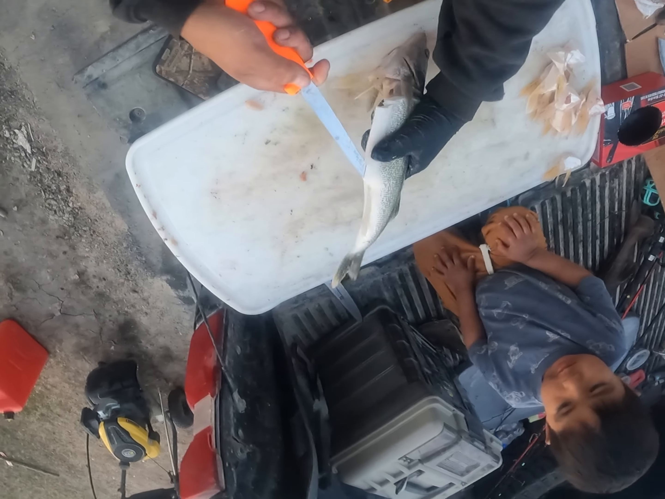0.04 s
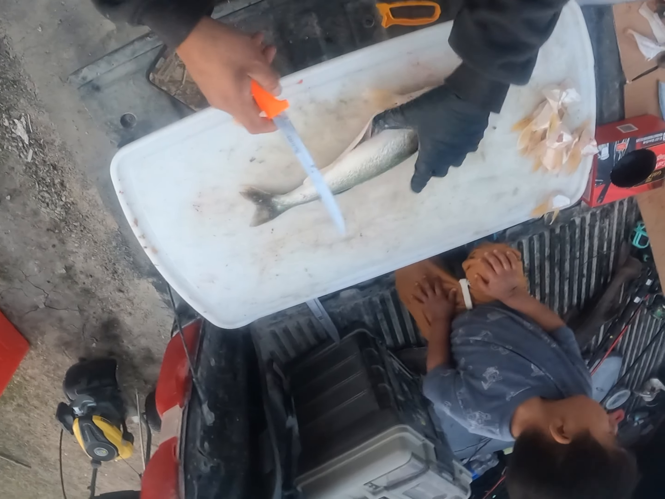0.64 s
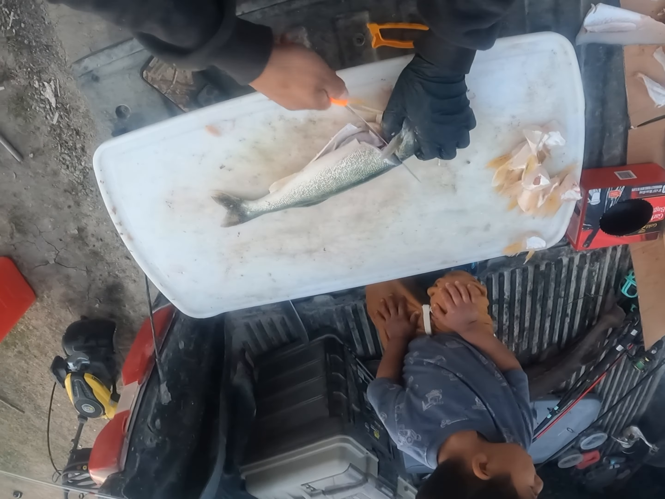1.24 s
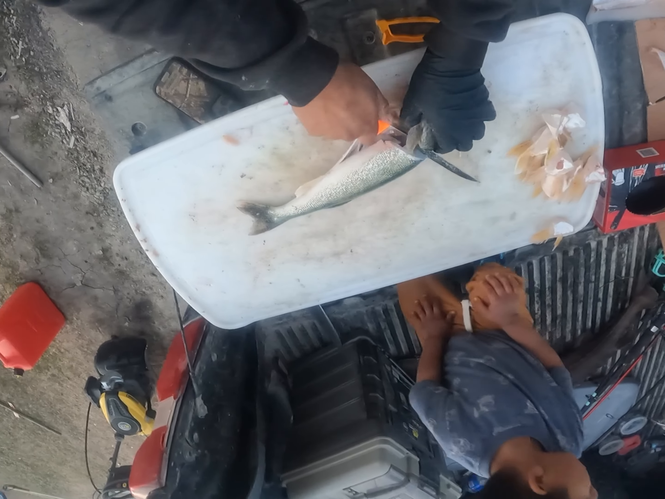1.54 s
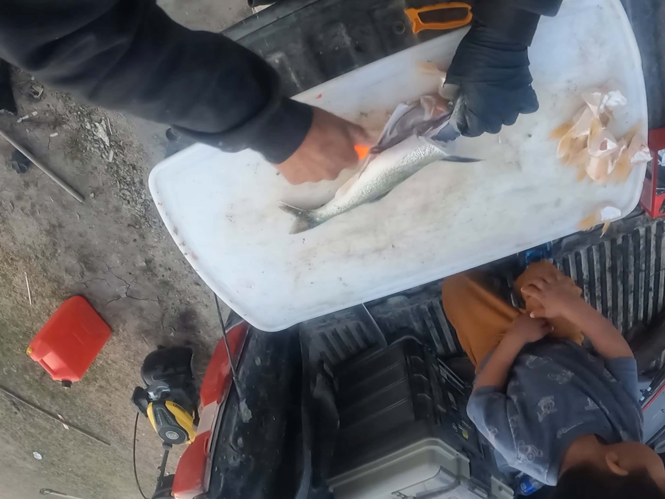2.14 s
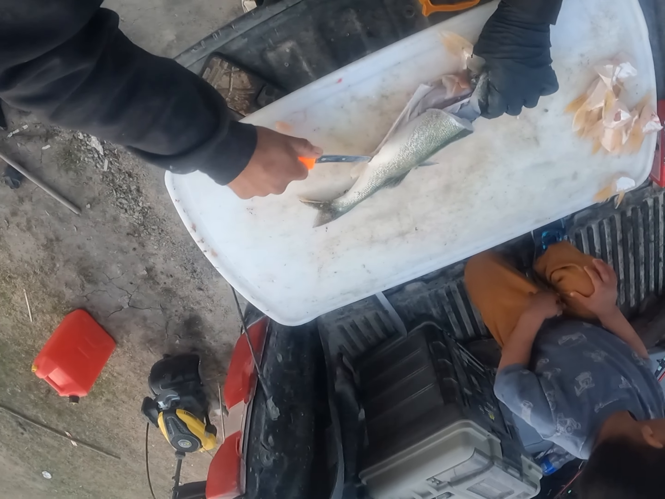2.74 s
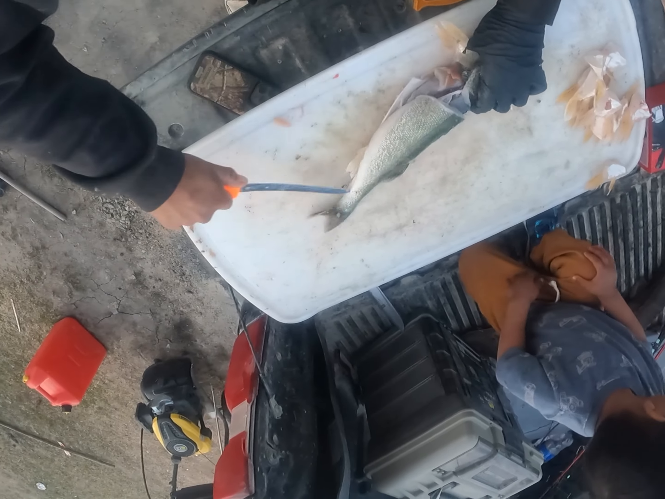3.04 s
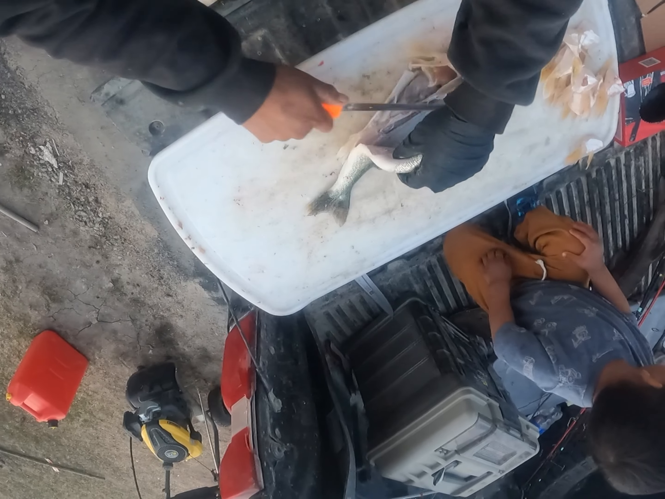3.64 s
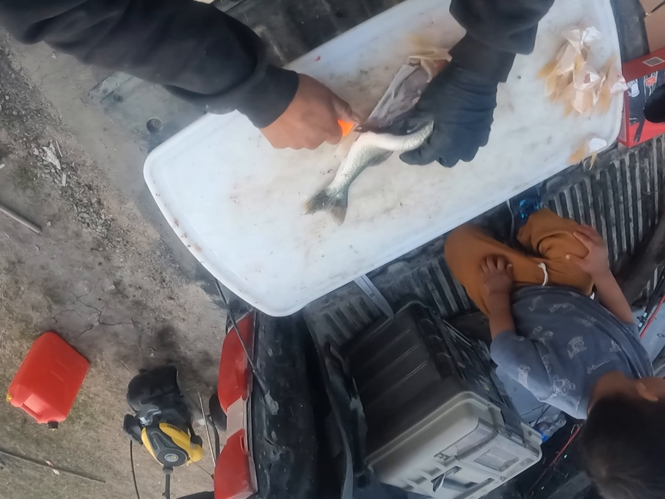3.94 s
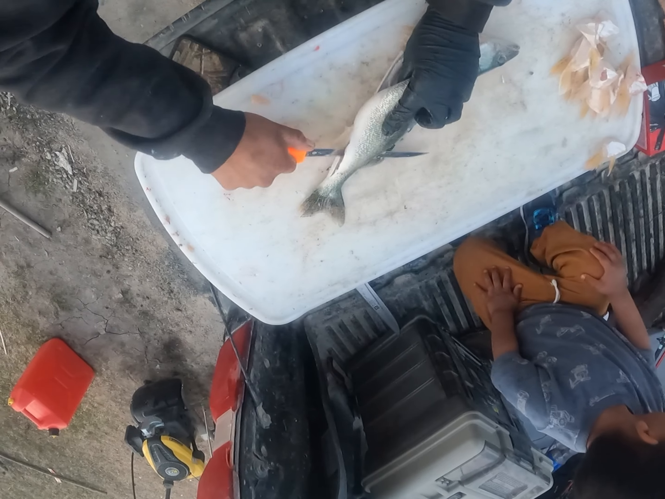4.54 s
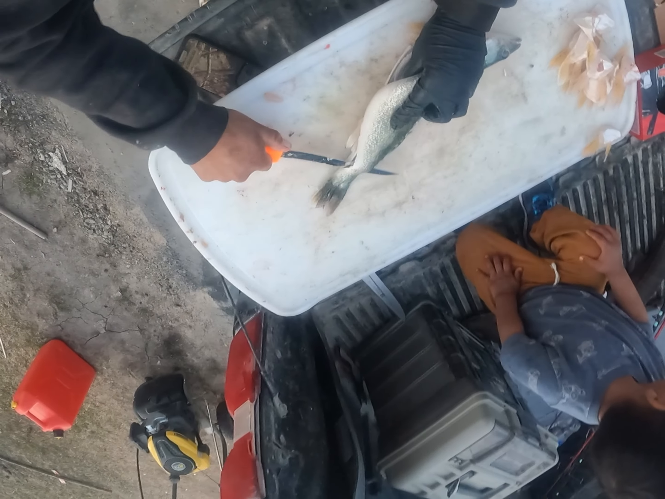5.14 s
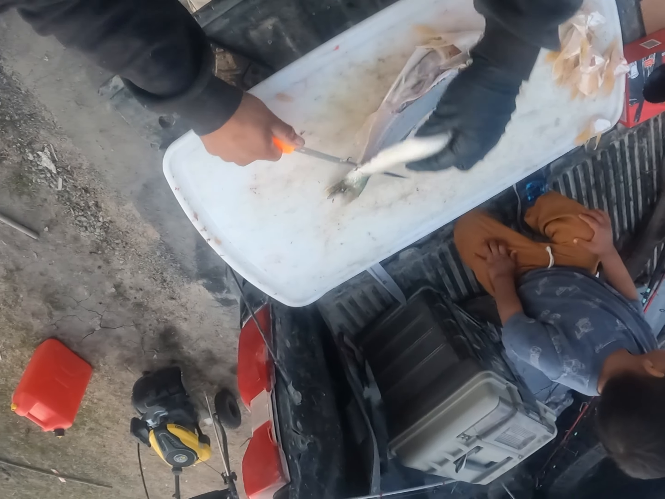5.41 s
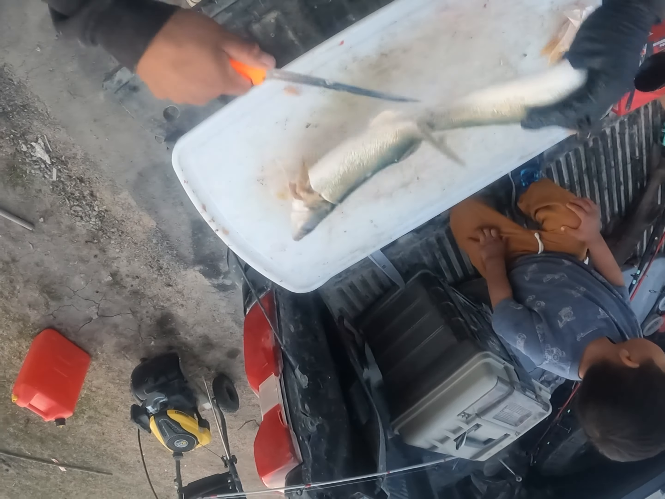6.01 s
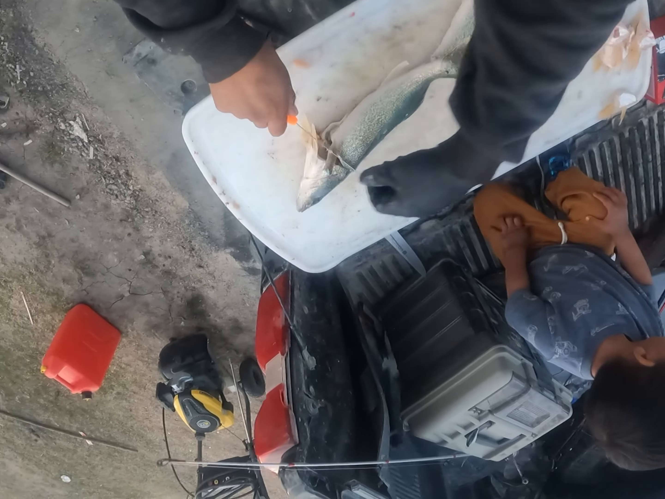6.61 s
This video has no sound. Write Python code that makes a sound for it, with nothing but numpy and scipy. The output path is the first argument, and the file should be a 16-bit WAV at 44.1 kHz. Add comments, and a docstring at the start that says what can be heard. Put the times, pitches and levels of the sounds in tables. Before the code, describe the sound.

A knife clatters lightly on the rim of a plastic cutting board and a fish lands with a wet slap. The blade crunches in through gristle and saws along in short bursts, snapping small bones, then flicks free with a brief ring. Duller strokes and wet slithering follow, and the fish thumps over near the end. The microphone is close, outdoors, with a light breeze on it.

```python
"""A knife fillets a fish on a plastic board, outdoors on a truck's tailgate, stereo microphone close above.
The edge catches and slips as it crunches in behind the head and saws along the backbone; bones snap,
and by the tail the bent blade flicks free and rings. Wet skin slithers in tiny ticks. The board rumbles
under the strokes and thumps when the fish is turned over. The truck throws back short reflections;
behind it all is faint open air, with a light breeze on the microphone."""
import sys
import numpy as np
from scipy import signal
from scipy.fft import rfft, irfft, next_fast_len
from scipy.io import wavfile
from scipy.ndimage import uniform_filter1d

SR = 44100
rng = np.random.default_rng(int(sys.argv[2]) if len(sys.argv) > 2 else 0)


def unload_wav(signal):
    """Save mono or channel-first audio to the path in sys.argv[1] as 16-bit WAV at rate SR, clipped to [-1, 1]."""
    wavfile.write(
        sys.argv[1],
        SR,
        np.round(np.clip(np.atleast_2d(signal).T, -1, 1) * 32767).astype(np.int16),
    )


N = 298557
TIME = np.arange(N) / SR

# Levels in the tables are relative: each source applies its own gain afterwards.
# how alike the two sides of the microphone are: (frequency [Hz], correlation [0-1])
MIC_LIKENESS = [(30, 0.88), (100, 1), (300, 0.97), (600, 0.89), (1200, 0.89), (2200, 0.7), (4500, 0.89),
                (8000, 0.87), (12000, 0.7)]
# tilt between the two sides: (frequency [Hz], left minus right [dB])
MIC_BALANCE = [(200, 0.15), (1000, 0), (2200, 0), (4500, -0.2), (8500, -2), (12000, -3)]
# open air all around: (frequency [Hz], level [dB])
AIR_SPECTRUM = [(15, -41), (25, -9), (139, 0), (237, -4.5), (450, -14.5), (588, -16), (655, -25.5),
                (1310, -14.5), (2130, -26.5), (3010, -25.5), (7480, -39.5), (11800, -45.5), (15000, -56.5)]
# wind buffeting the microphone: (frequency [Hz], level [dB])
BUFFET_SPECTRUM = [(20, -10.5), (45, 6.5), (70, -5.5), (120, -15.5), (300, -61.5)]
# breeze at the microphone: (time [s], level [dB])
BREEZE_CURVE = [(0.0, -42.5), (0.5, -49.5), (0.85, -71), (1.6, -68), (1.95, -51.5), (2.85, -44), (3.4, -65),
                (4.0, -64), (4.65, -44.5), (5.3, -54.5), (5.7, -48), (6.77, -50.5)]
# puffs of air, mostly as the fish is swung about: (time [s], level [dB])
AIR_PUFFS = [(0.05, -38), (0.41, -39), (1.83, -44), (5.85, -35.5), (6.22, -31)]

# the board on its support: (frequency [Hz], level [dB], t60 [s])
BOARD_MODES = [(62.8, -9.5, .2), (85.9, -4, 0.22), (121.7, -5, 0.24), (152.3, -2.5, .16),
               (186.4, -3.5, 0.21), (204.5, -1, 0.19), (238.3, -2.5, .16), (293.2, -3.5, 0.13),
               (329.2, -4, .13), (382.2, -3.5, 0.09), (478.4, -10.5, 0.099), (622.7, -16.5, 0.13),
               (705, -19, 0.078), (757, -18.5, 0.19), (812, -21.5, .1), (900, -13, 0.096),
               (1007, -22.5, 0.18), (1165, -26, .1)]
# hands lean on the board or shift the fish: (start [s], length [s], first level [dB], last level [dB])
HAND_PRESSES = [(0.322, 0.071, -43, -24.5), (0.385, 0.3, -31, -54), (1.546, 0.077, -55, -51),
                (1.845, 0.043, -29.5, -31), (1.9, 0.43, -42, -48.5), (2.335, 0.11, -33, -51),
                (2.832, 0.28, -46.5, -42.5), (3.081, 0.14, -33, -40), (3.207, 0.11, -36.5, -45),
                (4.04, .06, -50, -54), (4.16, 0.163, -46.5, -51.5), (4.68, .3, -50, -54),
                (5.17, 0.41, -50.5, -53.5), (5.6, 0.49, -44.5, -52), (5.794, 0.058, -38, -37.5),
                (6.147, .18, -27.5, -30), (6.361, 0.46, -51.5, -58.5)]
# wet skin slides on blade, glove and board: (start [s], length [s], first level [dB], last level [dB])
SKIN_SLIDES = [(0.0, 0.15, -58, -62), (0.306, 0.068, -48, -54), (0.404, .15, -56.5, -54),
               (0.56, 0.046, -46.5, -47), (0.63, 0.12, -57, -53), (0.836, 0.079, -59.5, -63.5),
               (1.142, 0.021, -64, -57), (1.27, 0.44, -70.5, -60.5), (1.88, 0.21, -56, -61),
               (2.33, 0.11, -49, -70), (2.834, 0.37, -49.5, -49), (3.201, .18, -52, -54),
               (3.425, .33, -60, -58.5), (3.866, 0.034, -54, -55.5), (3.984, 0.053, -59, -57),
               (4.14, 0.34, -56, -57), (4.922, 0.037, -62, -57.5), (5.036, 0.28, -63, -63),
               (5.295, 0.25, -55.5, -63.5), (5.511, 0.2, -51, -51.5), (5.714, 0.38, -62, -57.5),
               (5.888, .07, -49.5, -54), (6.092, 0.2, -43.5, -44), (6.3, 0.078, -52, -67.5),
               (6.597, 0.19, -72, -67)]
# sliding wet skin, close up: (frequency [Hz], level [dB])
SLITHER_SPECTRUM = [(200, -11), (500, 1.5), (800, -6.5), (1100, -2), (1600, -1), (2200, -3.5), (3100, -1),
                    (5000, 2), (6300, -0.5), (7400, 2.5), (8700, -4), (12000, -6.5), (15000, -22)]
# dull knocks on the board: fish and knife landing, and the thud of a bone cracking mid-cut:
# (time [s], slap [dB], slap pitch [Hz], thud [dB], slap t60 [s])
BOARD_KNOCKS = [(0.386, -15, 497, -25.5, 0.076), (0.391, -8, 4000, -32.5, 0.026),
                (0.851, -60, 730, -47, .04), (1.336, -45, 500, -53.5, 0.021),
                (1.796, -12, 990, -28.5, 0.025), (2.102, -35.5, 760, -57, 0.15),
                (2.142, -17, 917, -29.5, 0.098), (4.488, -20.5, 990, -40, 0.048),
                (4.621, -32, 500, -31.5, 0.02), (5.074, -34.5, 585, -44, 0.032),
                (5.816, -38, 600, -39, 0.3), (6.148, -12, 1330, -29, 0.047), (6.191, -7.5, 700, -21, 0.03),
                (6.292, -19.5, 895, -30, 0.083)]
# a wet slap: (frequency [Hz], level [dB])
SLAP_SPECTRUM = [(200, -6.5), (500, 4), (800, 2.5), (1500, -4), (2600, -4.5), (4600, -3.5), (6200, -12),
                 (7300, -11), (9000, -16.5), (12000, -23.5), (15000, -46)]

# the blade clatters on the board's rim: (time [s], level [dB], pitch [Hz])
RIM_TAPS = [(0.183, -30, 2060), (0.193, -26, 1470), (0.218, -21, 2080), (0.246, -23.5, 5150),
            (0.255, -18.5, 1350)]
# the ringing blade: (frequency [Hz], level [dB], t60 [s])
KNIFE_MODES = [(341, -5.5, 0.075), (700, -21, 0.044), (1100, -24.5, 0.1), (1550, -21.5, 0.071),
               (1930, -18.5, 0.049), (2483, -20, 0.051), (3495, 1.5, 0.0099), (3616, 1.5, 0.018),
               (4600, -18.5, 0.032), (4970, -19, .03), (5800, -9, 0.022), (5735, -4, 0.013),
               (7100, -8.5, 0.018), (7380, -17, .02), (8980, -14.5, 0.013), (10300, -25, .012)]
# bones, scales and fin rays give way: (time [s], level [dB], pitch [Hz])
BONE_CRACKS = [(0.1, -31.5, 1870), (1.663, -26.5, 3840), (1.684, -22.5, 2400), (1.73, -19, 4600),
               (1.776, -15, 4970), (1.811, -14.5, 5070), (1.84, -15.5, 3460), (2.205, -21.5, 1550),
               (2.231, -13.5, 5030), (2.264, -19, 5790), (2.298, -8.5, 1860), (2.318, -20.5, 5500),
               (2.374, -30.5, 1200), (2.581, -25.5, 1790), (2.601, -24.5, 4500), (2.652, -25, 3980),
               (2.671, -18, 3800), (2.844, -23.5, 7700), (2.895, -23, 2970), (4.39, -32, 3320),
               (4.489, -17, 1370), (4.541, -26.5, 4600), (4.581, -27.5, 4840), (4.617, -27.5, 2380),
               (4.82, -29, 7300), (4.845, -29, 5210), (4.885, -29.5, 5240), (5.094, -26.5, 5090),
               (5.937, -31, 1220), (6.107, -29.5, 7550), (6.209, -20, 2760)]
# a hard crack or click: (frequency [Hz], level [dB])
FRACTURE_SPECTRUM = [(200, -14), (700, 0), (1500, -0.5), (2600, -3), (4600, 0), (6200, -2), (7300, -1.5),
                     (9000, -9), (12000, -15.5), (15000, -29.5)]
# fine bones and scales splintering: (frequency [Hz], level [dB])
SPLINTER_SPECTRUM = [(1000, -16.5), (2500, 0), (5000, 1.5), (8000, -2), (12000, -11), (15500, -20.5)]
# tearing gristle: (frequency [Hz], level [dB])
CRUNCH_SPECTRUM = [(250, -24.5), (520, -1.5), (660, -0.5), (920, 1), (1150, -5.5), (1700, -4.5),
                   (2700, -6.5), (4600, -4), (7200, -11.5), (9000, -19), (12000, -26.5), (15000, -37.5)]
# how a slipping edge drives the board: (frequency [Hz], level [dB])
JUDDER_SPECTRUM = [(100, -19), (220, -9.5), (330, 0.5), (450, -0.5), (600, -1.5), (900, -22), (2000, -31.5)]
# the blade drawn lightly over scales or backbone: (start [s], length [s], crunch [dB], judder [dB])
LIGHT_DRAWS = [(1.532, .13, -48, -53.5), (2.09, 0.13, -59, -57), (2.489, 0.11, -51.5, -57.5),
               (2.84, .335, -56, -48.5), (5.026, .04, -55.5, -56)]
# knife strokes through ribs and gristle:
# (start [s], rise [s], fall [s], crunch [dB], judder [dB], wet skin [dB], rumble [dB])
KNIFE_STROKES = [(1.655, 0.14, 0.044, -28, -35.5, -39.5, -31.5), (2.19, 0.081, 0.066, -29, -37, -41.5, -27),
                 (2.573, 0.084, 0.012, -44, -48, -42.5, -32), (4.426, 0.071, 0.08, -41.5, -38, -50, -38.5),
                 (4.568, 0.038, 0.008, -59, -39, -52, -29.5), (4.807, 0.0415, 0.033, -60, -35, -49, -30.5),
                 (5.062, 0.038, 0.018, -51, -34, -47.5, -31.5)]

CUT_RELEASE_S, BOARD_RELEASE_S = .026, .041   # time constants
SWELL_DB_PER_S, EASE_DB_PER_S = 103.5, 137.5   # force builds as the edge bites, eases once it is through
KNOCK_WIDTH_HZ = 140


def from_db(db):
    return 10 ** (np.asarray(db) / 20)


def to_db(gain):
    return 20 * np.log10(gain + 1e-9)


def rms_one(x):
    return x / np.sqrt(np.mean(x ** 2) + 1e-20)


def at_hz(points, hz):
    """Read a table on a log-frequency axis."""
    f, value = np.transpose(points)
    return np.interp(np.log(hz + 1), np.log(f), value)


def drift(per_s):
    """A random wander of rms 1."""
    knots = rng.standard_normal(4000)
    return rms_one(np.interp(TIME * per_s, np.arange(len(knots)), knots))


def add(out, s, sound):
    """Lay a short sound in at time s."""
    at = int(s * SR)
    out[..., at:at + sound.shape[-1]] += sound[..., :N - at]


def butter(x, order, hz, kind="low"):
    return signal.sosfilt(signal.butter(order, hz, kind, fs=SR, output="sos"), x)


def colour(x, spectrum):
    """Minimum-phase filter with the given spectrum and unit power gain."""
    size = 4096
    gain = rms_one(from_db(at_hz(spectrum, np.arange(size // 2 + 1) * SR / size)))
    cepstrum = irfft(np.log(gain))
    cepstrum[1:size // 2] *= 2
    cepstrum[size // 2 + 1:] = 0
    return signal.oaconvolve(x, irfft(np.exp(rfft(cepstrum))))[:N]


def resonance(x, hz, width_hz):
    """Band-pass with gain 1 at its peak."""
    r = np.exp(-np.pi * width_hz / SR)
    feedback = [1, -2 * r * np.cos(2 * np.pi * hz / SR), r * r]
    return signal.lfilter(np.array([1, 0, -1]) * (1 - r * r) / 2, feedback, x)


def ring(force, modes, spread_db=0):
    """A force sets each mode ringing as a damped sine."""
    out = 0
    for k, (hz, db, t60) in enumerate(modes):
        r, w = np.exp(-np.log(1000) / (t60 * SR)), 2 * np.pi * hz / SR
        strength = (-1) ** k * from_db(db + spread_db * rng.standard_normal())
        out += strength * signal.lfilter([0, np.sin(w)], [1, -2 * r * np.cos(w), r * r], force + 1e-18)
    return out


def evened(x, samples):
    """Hold a texture's running rms at 1, keeping its fine grain."""
    return x / np.sqrt(np.abs(uniform_filter1d(x * x, samples)) + 1e-9)


def grains(per_s, size_db):
    """Random tiny slips, mostly small and a few large; rms 1."""
    sizes = from_db(size_db * np.minimum(rng.exponential(1, N), 4.5)) * rng.choice([-1, 1], N)
    return rms_one(sizes * (rng.random(N) < per_s / SR))


def pitched_grains(per_s, size_db, cycles, patchy_db, patches_per_s):
    """Ticks dealt to small resonators that each wax and wane on their own; the high ones get most."""
    pitches = np.geomspace(600, 13000, 22)
    ticks = grains(per_s, size_db)
    dealt = rng.choice(len(pitches), N, p=pitches / pitches.sum())
    out = np.zeros(N)
    for k, hz in enumerate(pitches):
        at, share = np.flatnonzero(dealt == k), np.full(N, 1e-18)
        patches = np.interp(TIME[at] * patches_per_s, np.arange(1000), rng.standard_normal(1000))
        share[at] = ticks[at] * from_db(patchy_db * patches) / np.sqrt(hz)
        out += resonance(share, hz, hz / cycles) / np.sqrt(hz)
    return rms_one(out)


def burst(hz, t60, focus, width, tail_db, tail_s):
    """A sharp break, a quick run of micro-breaks and a faint tail, partly through one resonance."""
    t = TIME[:SR // 6]
    rise = 1 - np.exp(-t / .00027)
    spike = .93 * np.exp(-t / .00098)
    run = np.exp(-np.log(1000) * t / t60)
    tail = from_db(tail_db) * np.exp(-t / tail_s)
    breaks = rng.standard_normal(len(t))
    pitched = breaks + focus * resonance(breaks, hz, width * hz)
    return evened(pitched, samples=90) * rise * (spike + run + tail) / np.pi


def gate(start, length, attack_s, release_s):
    """Rounded attack, hold and exponential release."""
    t = np.maximum(TIME - start, 0)
    return (1 - np.exp(-t / attack_s)) ** 2 * np.exp(-np.clip((t - length) / release_s, 0, 20))


def gestures(rows, attack_s, release_s):
    """Joint strength of movements that each set in, grow or fade steadily, and stop."""
    power = 0
    for start, length, first_db, last_db in rows:
        ramp = from_db(np.interp(TIME, [start, start + length], [first_db, last_db]))
        power += (ramp * gate(start, length, attack_s, release_s)) ** 2
    return np.sqrt(power)


def open_air():
    """The faint, steady air of the place."""
    return from_db(-59.5) * rms_one(colour(rng.standard_normal(N), AIR_SPECTRUM))


def wind_on_microphone():
    """An unsteady breeze and a few puffs buffet the microphone in the bass."""
    breeze_db = np.interp(TIME, *np.transpose(BREEZE_CURVE))
    gust_db, puff_width_s = 3 * drift(per_s=9), .052
    puffs = sum(from_db(db) * np.exp(-((TIME - s) / puff_width_s) ** 2) for s, db in AIR_PUFFS)
    buffet = evened(colour(rng.standard_normal(N), BUFFET_SPECTRUM), samples=5000)
    return from_db(-.5) * (from_db(breeze_db + gust_db) + puffs) * buffet


def truck_reflections(x, t60, wet_db):
    """Short scatter off the truck and the gear nearby, different at each side."""
    t = TIME[:SR // 4]
    scatter = rng.standard_normal((2, len(t))) * np.exp(-np.log(1000) * t / t60) * (t > .001)
    scatter = butter(scatter, 1, 1500, "high")
    scatter /= np.sqrt(np.sum(scatter ** 2, axis=1, keepdims=True))
    return from_db(wet_db) * signal.oaconvolve(x[None], scatter, axes=1)[:, :N]


def stereo_microphone(x):
    """The two ports nearly agree in the bass and part in phase and level toward the treble."""
    size = next_fast_len(N + 2000)
    hz = np.arange(size // 2 + 1) * SR / size
    side = np.array([[1], [-1]])
    phase = side * np.arccos(np.clip(at_hz(MIC_LIKENESS, hz), -1, 1)) / 2
    gain = from_db(side * at_hz(MIC_BALANCE, hz) / 2)
    return irfft(rfft(x, size) * np.exp(1j * phase) * gain, size)[:, :N]


def board_rumble(stroke_load):
    """The soft, uneven drag of hands and knife shakes the board's low modes."""
    hand_load = gestures(HAND_PRESSES, attack_s=.008, release_s=BOARD_RELEASE_S)
    drag = butter(grains(per_s=1200, size_db=1.5), 2, 280)
    rumble = evened(ring(drag, BOARD_MODES), samples=1100)
    return from_db(-1.24) * np.hypot(stroke_load, hand_load) * rumble


def board_flex(stroke_load, hz=100, width_hz=120):
    """A stroke bears down unevenly and bends the whole board on its support."""
    push = grains(per_s=1100, size_db=1.5)
    bend = resonance(resonance(push, hz, width_hz), hz, width_hz)
    return from_db(-7.5) * stroke_load * evened(bend, samples=1500)


def skin_slither(stroke_slide, attack_s=.0086, release_s=.017):
    """Wet flesh clings and lets go in clumps of tiny ticks; faster sliding is brighter."""
    creep = from_db(-72) * gate(0, 6.38, attack_s, release_s)   # in the grip, until the hands let go
    handling = np.hypot(gestures(SKIN_SLIDES, attack_s, release_s), creep)
    level_db = to_db(np.hypot(stroke_slide, handling))
    ticks = pitched_grains(per_s=14000, size_db=3.5, cycles=6.6, patchy_db=3.5, patches_per_s=20)
    clumps = from_db(2 * drift(per_s=110))
    wet = evened(colour(ticks * clumps, SLITHER_SPECTRUM), samples=1500)
    dull = butter(wet, 1, 2200)
    brisk_db = np.maximum(level_db + 56, 0)   # how far above a slow slide
    return from_db(level_db + 3) * (wet - dull + dull * from_db(-.24 * brisk_db))


def board_knocks():
    """Fish or knife lands, or a bone cracks mid-cut: a wet slap, and a soft push that thuds the board."""
    slaps, thuds = np.zeros(N), np.zeros(N)
    t, contact_s = TIME[:SR // 2], .0006
    push = t / contact_s * np.exp(-t / contact_s)
    for s, db, hz, thud_db, t60 in BOARD_KNOCKS:
        add(slaps, s, from_db(db) * burst(hz, t60, focus=2.64, width=.91, tail_db=-25.5, tail_s=.026))
        add(thuds, s, from_db(thud_db) * ring(push / push.sum(), BOARD_MODES, spread_db=2.5))
    knock = resonance(slaps, hz=373, width_hz=KNOCK_WIDTH_HZ)
    return from_db(-4.5) * colour(slaps, SLAP_SPECTRUM) + from_db(5) * knock + from_db(3) * thuds


def rim_taps():
    """The blade skips along the rim; each touch rings briefly and knocks the knife's lowest mode."""
    taps = np.zeros(N)
    for s, db, hz in RIM_TAPS:
        add(taps, s, from_db(db) * burst(hz, t60=.05, focus=5, width=.088, tail_db=-24, tail_s=.015))
    knock = resonance(taps, hz=350, width_hz=KNOCK_WIDTH_HZ)
    return from_db(-1.5) * colour(taps, FRACTURE_SPECTRUM) + from_db(15.5) * knock


def blade_flick(at_s):
    """The bent blade flicks free, rings, and chatters briefly as it settles."""
    force, crack = np.zeros(N), np.zeros(N)
    t, settle_s = TIME[:SR // 4], .035
    chatter = from_db(-48) * rng.standard_normal(len(t)) * np.exp(-t / settle_s)
    add(force, at_s, np.ones(1))
    add(force, at_s, chatter)
    add(crack, at_s, burst(hz=5500, t60=.027, focus=.96, width=.6, tail_db=-25, tail_s=.018))
    return from_db(-7.5) * (ring(force, KNIFE_MODES) + from_db(-2) * colour(crack, FRACTURE_SPECTRUM))


def bone_cracks():
    """Each bone breaks with a pitch of its own and jolts the board a little."""
    cracks = np.zeros(N)
    for s, db, hz in BONE_CRACKS:
        crack = burst(hz, t60=.022, focus=3.6, width=.17, tail_db=-26.5, tail_s=.012)
        add(cracks, s, from_db(db) * crack)
    return from_db(-.5) * colour(cracks, FRACTURE_SPECTRUM) + from_db(-33) * ring(cracks, BOARD_MODES)


def splinters(effort, per_s=110):
    """Fine bones and scales give way at random in single sharp ticks, harder as the crunch grows."""
    sizes = from_db(rng.uniform(-15, 0, N)) * rng.choice([-1, 1], N)
    ticks = sizes * (rng.random(N) < per_s / SR)
    return from_db(-11.5) * effort * rms_one(colour(ticks, SPLINTER_SPECTRUM))


def stroke_force(start, rise, fall, release_s):
    """The edge bites, bears down harder and harder, eases off and lets go; about 1 at full force."""
    t = np.clip(TIME - start - rise, -rise, fall)
    force_db = np.minimum(SWELL_DB_PER_S * t, -EASE_DB_PER_S * t)
    return from_db(force_db) * gate(start, rise + fall, attack_s=.0071, release_s=release_s)


def cutting_forces():
    """Strength of the crunch, the judder, the wet sliding and the board's load under the knife."""
    effort, shake, slide, load = np.zeros((4, N))
    for start, length, crunch_db, judder_db in LIGHT_DRAWS:
        force = gate(start, length, attack_s=.0066, release_s=CUT_RELEASE_S)
        effort += from_db(crunch_db) * force
        shake += from_db(judder_db) * force
    for start, rise, fall, crunch_db, judder_db, wet_db, rumble_db in KNIFE_STROKES:
        force = stroke_force(start, rise, fall, CUT_RELEASE_S)
        effort += from_db(crunch_db) * force
        shake += from_db(judder_db) * force
        slide += from_db(wet_db) * force
        load += from_db(rumble_db) * stroke_force(start, rise, fall, BOARD_RELEASE_S)
    return effort, shake, slide, load


def stick_slip(per_s, release_s, steady):
    """The edge catches and lets go at random: jumps in force that die away over a steady drag."""
    jumps = rng.uniform(.32, 1, N) * (rng.random(N) < per_s / SR)
    return steady + signal.lfilter([1], [1, -np.exp(-1 / (release_s * SR))], jumps + 1e-18)


def knife_crunch(effort, shake):
    """The edge tears gristle in coarse slips that judder the board; hard strokes make it sound hollow."""
    slips = stick_slip(per_s=210, release_s=.0016, steady=.23)
    tears = pitched_grains(per_s=16000, size_db=3, cycles=5.2, patchy_db=1.5, patches_per_s=74) * slips
    knocks = ring(grains(per_s=900, size_db=1) * slips, BOARD_MODES)
    gristle = evened(colour(tears, CRUNCH_SPECTRUM), samples=900)
    hollow = evened(butter(knocks, 2, [660, 1050], "band"), samples=700)
    judder = evened(colour(knocks, JUDDER_SPECTRUM), samples=700)
    return from_db(-3) * effort * gristle + from_db(2) * effort ** 1.284 * hollow + shake * judder


def scene():
    """Knife and hands work close below the microphone; the board and the breeze fill the bass."""
    effort, shake, slide, load = cutting_forces()
    cuts = knife_crunch(effort, shake) + splinters(effort) + bone_cracks()
    work = cuts + rim_taps() + blade_flick(at_s=3.1848) + skin_slither(slide) + board_knocks()
    background = board_rumble(load) + board_flex(load) + wind_on_microphone() + open_air()
    return stereo_microphone(work + background) + truck_reflections(work, t60=.11, wet_db=-11.5)


def record(dry):
    """The recorder has a low cut at 20 Hz and a steep high cut at 15.5 kHz."""
    high_cut = signal.ellip(10, .2, 80, 15500, fs=SR, output="sos")
    return signal.sosfilt(high_cut, butter(dry, 2, 20, "high"))


dry = scene()
out = record(dry)
unload_wav(out)
```